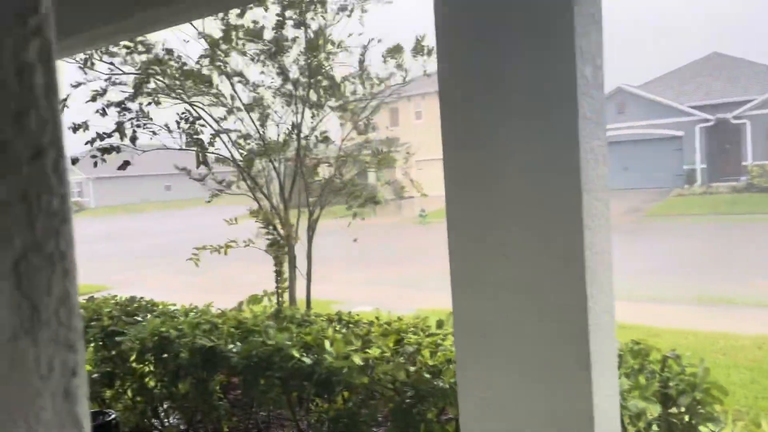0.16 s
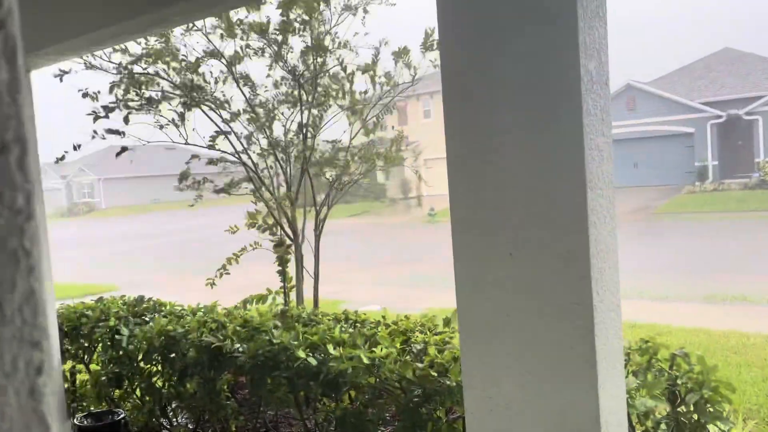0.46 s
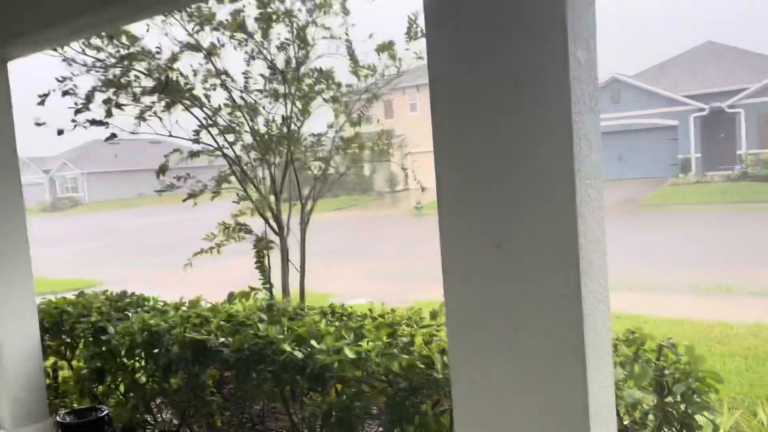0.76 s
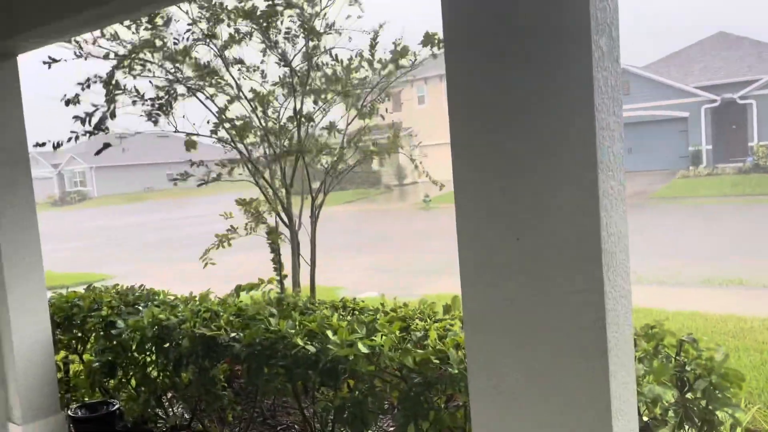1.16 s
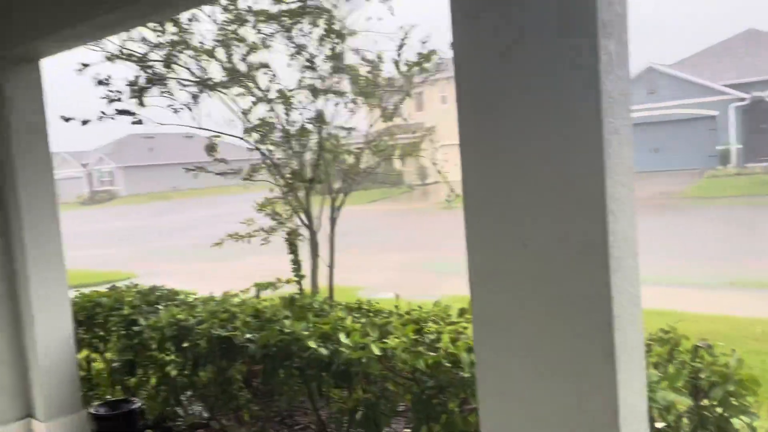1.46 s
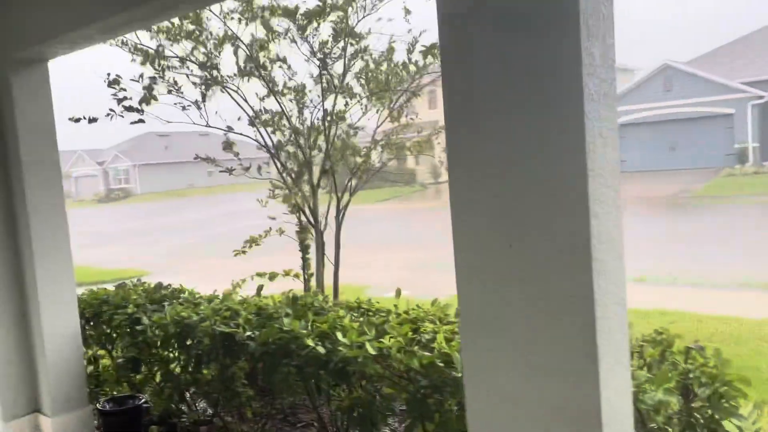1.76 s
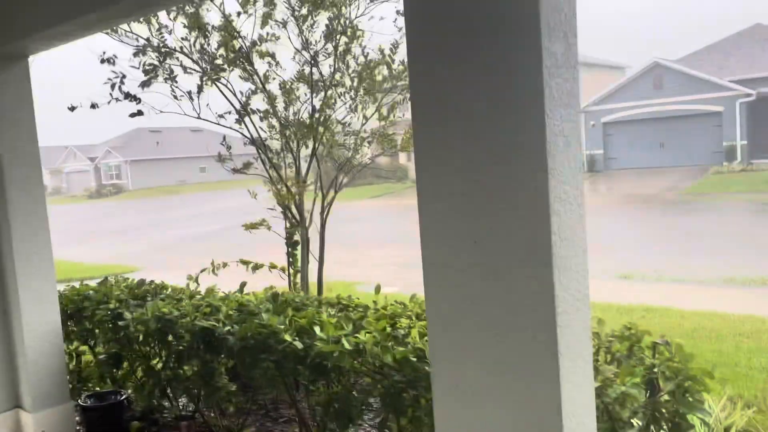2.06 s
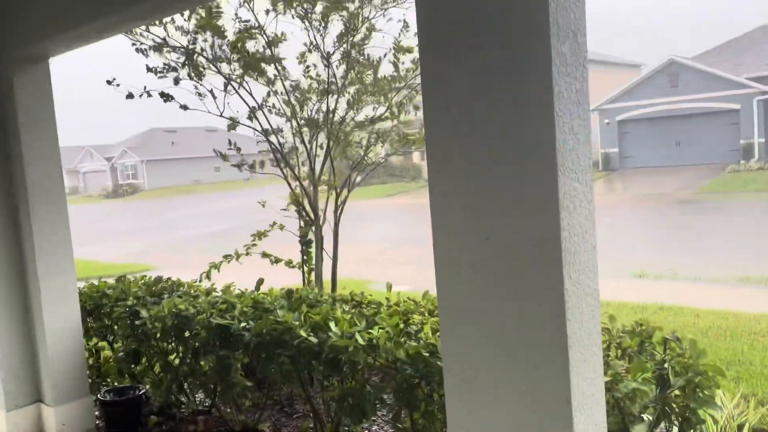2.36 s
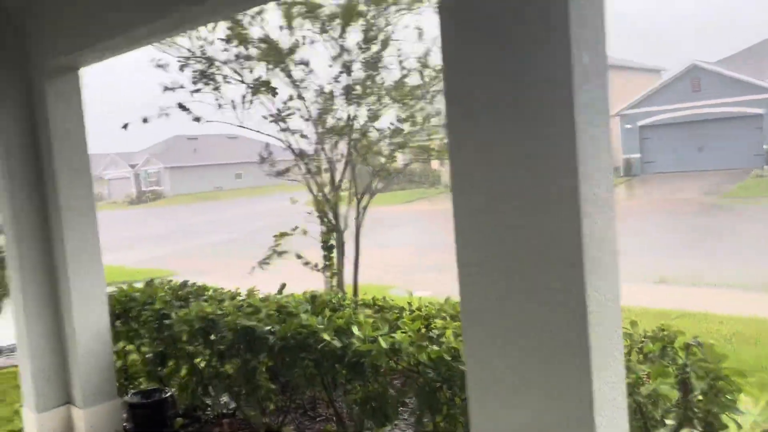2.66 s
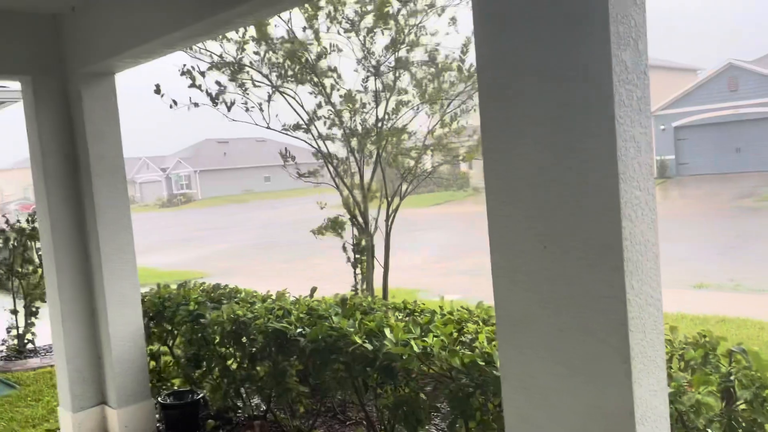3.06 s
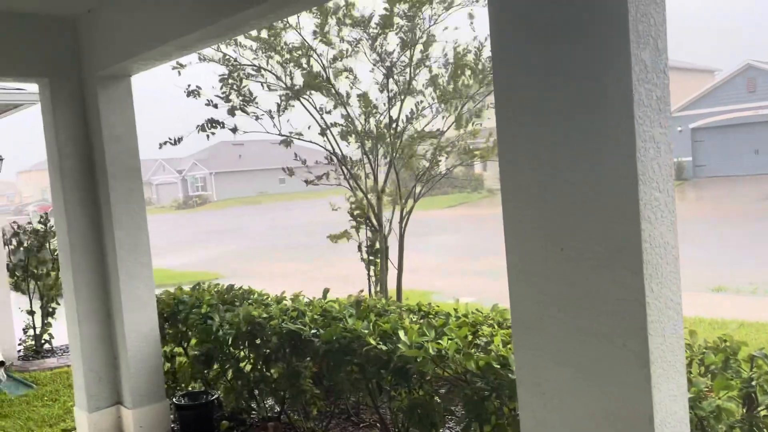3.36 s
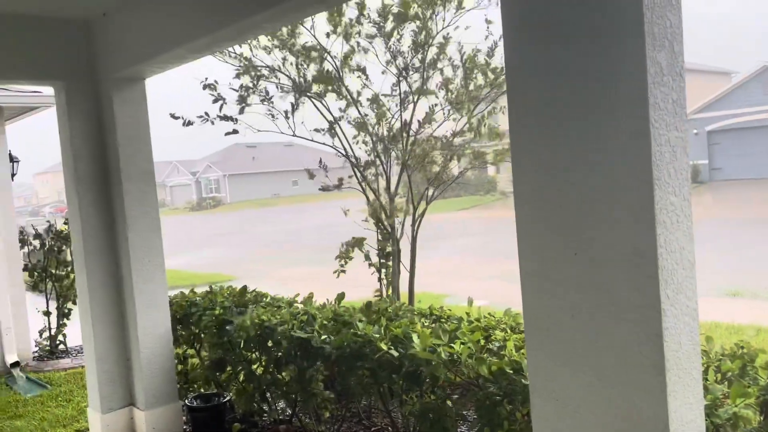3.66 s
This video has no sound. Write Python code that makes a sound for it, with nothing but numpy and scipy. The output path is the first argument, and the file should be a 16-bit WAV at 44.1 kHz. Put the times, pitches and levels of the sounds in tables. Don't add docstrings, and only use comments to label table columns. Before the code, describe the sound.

Rainstorm heard from a porch: dense hiss, wind buffeting, and nearby splats of dripping water.

```python
import sys
import numpy as np
from scipy import signal
from scipy.fft import rfft, irfft, next_fast_len
from scipy.io import wavfile
from scipy.ndimage import uniform_filter1d, map_coordinates

SR = 44100
rng = np.random.default_rng(int(sys.argv[2]) if len(sys.argv) > 2 else 0)


def materialize(psi):
    bounded = np.clip(np.atleast_2d(psi).T, -1, 1)
    quanta = np.round(bounded * 32767).astype(np.int16)
    wavfile.write(sys.argv[1], SR, quanta)


def invert_db(x):
    u = np.asarray(x, float) / 20
    return 10 ** u


N = 167580

# t/s, level/dB
RAIN_LEVEL = [(0, -46), (1.15, -48), (1.93, -47.5), (3.14, -49.5), (3.8, -48)]
# f/Hz, level per Hz/dB
PATTER_SUM = [(150, -8), (500, -15.5), (800, -3), (2200, -4.5), (3300, -6.5), (5200, -8.5), (7000, -10.5),
              (8300, -23.5)]
PATTER_DIFFERENCE = [(150, -39), (500, -8.5), (800, -2.5), (2200, -4.5), (2700, -6.5), (4400, -11),
                     (5500, -9.5), (7500, -20)]
# f/Hz, level per Hz/dB
SPRAY_SUM = [(7500, -12), (8900, -30), (9800, -2.5), (11200, 0.5), (12900, 4), (14000, -2), (15600, -5),
             (17000, -30)]
SPRAY_DIFFERENCE = [(4500, -30), (6500, -1.5), (8600, 6), (10500, 2), (12300, -4.5), (12600, -25),
                    (15000, -37)]
# f/Hz, share/1
QUADRATURE_SHARE = [(1000, 0.22), (5000, 0.4), (6000, -.3), (7500, -0.4), (9500, 0.8)]
PATTER_DB, SPRAY_DB, TICK_DB = 6, -0.5, -20
PATTER_PER_GUST = 0.019

# t/s, level/dB
GUST_LEVEL = [(0, -42), (.1, -58), (.25, -47), (.7, -52.5), (.98, -52.5), (1.12, -45.5), (1.35, -46.5),
              (1.55, -48), (1.85, -43.5), (2.0, -42.5), (2.18, -43.5), (2.4, -45.5), (2.67, -41),
              (2.95, -42), (3.2, -45), (3.45, -41.5), (3.62, -44), (3.8, -42.5)]
# t/s, level/dB
TURBULENCE_LEVEL = [(0, -33.5), (.13, -45), (.26, -41), (.66, -47.5), (.8, -43.5), (.97, -46), (1.3, -48),
                    (1.55, -47.5), (1.75, -41), (1.95, -49.5), (2.12, -45.5), (2.41, -38.5), (2.62, -41.5),
                    (2.87, -35.5), (3.1, -43), (3.35, -46), (3.6, -42), (3.8, -39.5)]
# f/Hz, level per Hz/dB
ROAR_SPECTRUM = [(60, -37), (150, -9), (320, 3.5), (600, -2), (1200, -9), (3500, -30.5)]
# f/Hz, level per Hz/dB
RUMBLE_SPECTRUM = [(20, -43), (45, -3), (75, 2.5), (130, -5.5), (230, -16.5), (700, -40.5)]
ROAR_SIDE_DB, RUMBLE_SIDE_DB, RUMBLE_DB = -7.5, -12, 1.5

# f/Hz, t60/s
PORCH_T60 = [(200, 0.26), (2000, 0.1), (10000, 0.066)]
PORCH_DB = -2.5
# t/s, peak level/dB, centre f/Hz, spread/s
SLUGS = [(1.024, -24, 1090, 0.038), (1.052, -24, 1396, 0.041), (1.076, -33, 1280, 0.035),
         (1.603, -22, 933, 0.044), (1.872, -25, 1390, .04), (2.164, -20.5, 1100, 0.041),
         (2.409, -25, 1050, 0.048), (2.439, -25.5, 1500, 0.044), (2.615, -24, 1190, 0.045),
         (2.836, -23.5, 1410, 0.048), (3.103, -21.5, 1010, 0.052), (3.665, -25, 1500, 0.046)]
# t/s, peak level/dB, centre f/Hz, spread/s
PLOPS = [(.4295, -24, 3000, 0.004), (1.026, -21.5, 2120, .005), (1.032, -25, 1020, .008),
         (1.054, -23.5, 1460, 0.0036), (1.078, -27, 3020, 0.0038), (1.606, -25.5, 970, 0.0064),
         (1.606, -32, 2170, .004), (1.892, -24, 3420, 0.0052), (3.108, -29, 2600, .006),
         (2.166, -19, 1280, 0.0044), (2.167, -24.5, 2700, .004), (2.186, -26, 1060, 0.0069),
         (2.845, -26, 2780, 0.0053), (1.13, -20, 11900, .002), (1.889, -21.5, 2150, .01),
         (2.841, -23, 1880, 0.0059)]
# f/Hz, level per Hz/dB
MIST_SPECTRUM = [(1500, -15), (3000, 5.5), (6500, 1.5), (8000, -13)]
MIST_DB = -13.5
DROP_TURNS, THUD_HZ = 3.15, 313

# t/s, peak level/dB, f/Hz
STRONG_EDDIES = [(0.0166, -6, 296), (0.0393, -17, 200), (0.0561, -15, 226), (0.0796, -25, 150),
                 (0.0931, -28, 116), (0.117, -18.5, 290), (0.1443, -26.5, 108), (0.3032, -23, 92),
                 (0.3303, -13, 155), (0.3714, -28, 87), (0.3917, -23, 179), (0.4068, -17.5, 328),
                 (0.4951, -32, 173)]
# t/s, peak level/dB, f/Hz
FURTHER_SWINGS = [(.071, -26.5, 304), (0.11, -22.5, 100), (.3296, -11.5, 487), (.3314, -15.5, 525),
                  (0.0218, -23, 150), (0.07, -26, 224), (.4125, -25, 226), (.424, -24.5, 490),
                  (0.25, -31, 330), (.325, -24, 254), (0.045, -22.5, 260), (0.036, -21, 190),
                  (0.33, -20.5, 64), (.418, -24.5, 360)]
# t/s, peak level/dB, f/Hz
LATER_EDDIES = [(0.8764, -26, 121), (1.2606, -31, 144), (1.6779, -35, 184), (2.1044, -34, 190),
                (2.1776, -41, 321), (2.1947, -30, 340), (2.2215, -28, 288), (2.2412, -30, 298),
                (2.2794, -40, 184), (2.3009, -25, 129), (2.3674, -25.5, 127), (2.3949, -28, 125),
                (2.4512, -25, 127), (2.4791, -26, 160), (2.5713, -30, 116), (2.7169, -24, 147),
                (2.7507, -23.5, 197), (2.8161, -35, 168), (2.8447, -29, 152), (2.9034, -35, 140),
                (2.9215, -27.5, 121), (2.9449, -28, 112), (3.1407, -30.5, 238), (3.1697, -29.5, 266),
                (3.6781, -47, 155)]
# t/s at onset, peak level/dB, f/Hz
FAINT_EDDIES = [
    (0.716, -36, 81.5),
    (1.158, -31, 87),
    (1.212, -28.5, 82),
    (1.354, -31, 79),
    (1.399, -32, 84.5),
    (1.568, -40, 72.7),
]
# t/s, level/dB, half length/s
BRIGHT_EDGE = (.329, -31, .0025)
# f/Hz, level per Hz/dB
WAKE_SPECTRUM = [(30, 5.5), (80, 1.5), (250, -8.5), (500, -10.5), (900, -42.5)]
PUFF_RISE_S, WAKE_S, WAKE_DB, EDDY_SIDE_DB = 0.0116, 0.016, -13, -12
EDDY_TURNS, EDDY_SAG, EDDY_TAIL = 0.54, 0.77, 1.4

# f/Hz, level/dB
PORT_BALANCE = [(60, 0), (200, 0.6), (380, 1.5), (700, 2.5), (1400, 1.2), (2800, 0), (5600, 3.2),
                (10000, -0.7)]
DIP_HZ, DIP_WIDTH_HZ, DIP_DB = 5620, 105, -7.5
NULL_HZ, NULL_WIDTH_HZ, NULL_DB = 8630, 300, -40
WIDE_TO_HZ = 13050


def unit(x):
    return x / np.sqrt(np.mean(x ** 2) + 1e-20)


def along(points, hz):
    f, v = np.transpose(points)
    return np.interp(np.log(hz + 1), np.log(f + 1), v)


def curve(rows):
    s, v = np.transpose(rows)
    return np.interp(np.arange(N) / SR, s, v)


def wobble(rate):
    return map_coordinates(rng.standard_normal(400), [np.arange(N) * rate / SR])


def filtered(x, response):
    m = next_fast_len(N + SR // 2)
    return irfft(rfft(x, m) * response(np.fft.rfftfreq(m, 1 / SR)), m)[..., :N]


def ports(mid, side):
    return np.array([mid + side, mid - side])


def rush(mid, side, patchy_db, side_db=0, grit=0):
    z = signal.stft(rng.standard_normal((2, N)) + grit, nperseg=512)[2]
    field = uniform_filter1d(rng.standard_normal(z.shape[1:]), size=6, axis=0)
    field = uniform_filter1d(field, size=10, axis=1)
    a, b = signal.istft(z * invert_db(patchy_db * unit(field)), nperseg=512)[1][:, :N]

    def coherent(hz):
        return -1j * along(QUADRATURE_SHARE, hz) * invert_db(along(side, hz))

    def independent(hz):
        return np.sqrt(1 - along(QUADRATURE_SHARE, hz) ** 2) * invert_db(along(side, hz))

    total = filtered(a, lambda hz: invert_db(along(mid, hz)))
    difference = filtered(a, coherent) + filtered(b, independent)
    return ports(total, invert_db(side_db) * difference) / np.std(total)


def ticks(spread_db, count):
    when, rarity, sign = np.moveaxis(rng.random((2, count, 3)), 2, 0)
    size = invert_db(-spread_db * np.log(1 - rarity)) * np.sign(sign - .5)
    return unit(np.array([np.bincount((w * N).astype(int), s, N) for w, s in zip(when, size)]))


def rain():
    gust_db = curve(GUST_LEVEL)
    rain_db = curve(RAIN_LEVEL) + 0.12 * wobble(3.5) + 0.15 * wobble(23.5)
    near_patter = invert_db(TICK_DB) * ticks(spread_db=-1.5, count=4000)
    near_spray = invert_db(TICK_DB + 6) * ticks(spread_db=3, count=6000)
    patter = rush(PATTER_SUM, PATTER_DIFFERENCE, patchy_db=1.5, grit=near_patter)
    spray = rush(SPRAY_SUM, SPRAY_DIFFERENCE, patchy_db=2.0, grit=near_spray)
    patter_db = PATTER_DB + PATTER_PER_GUST * (gust_db - gust_db.mean()) + 0.39 * wobble(8.05)
    spray_db = SPRAY_DB + 0.33 * wobble(9.4)
    return invert_db(rain_db) * (invert_db(patter_db) * patter + invert_db(spray_db) * spray)


def wind():
    roar_db = curve(GUST_LEVEL) + 0.57 * wobble(5.83) + 0.21 * wobble(26)
    roar = rush(ROAR_SPECTRUM, ROAR_SPECTRUM, patchy_db=1.5, side_db=ROAR_SIDE_DB)
    rumble = rush(RUMBLE_SPECTRUM, RUMBLE_SPECTRUM, patchy_db=3.0, side_db=RUMBLE_SIDE_DB)
    lumps = unit(invert_db(1.23 * wobble(20.87)) * rumble)
    return invert_db(roar_db) * roar + invert_db(curve(TURBULENCE_LEVEL) + RUMBLE_DB) * lumps


def porch(x):
    hz, t, z = signal.stft(rng.standard_normal((2, SR // 2)), SR, nperseg=256)
    decay_db = -60 * t / along(PORCH_T60, hz)[:, None]
    tail = signal.istft(z * invert_db(decay_db), SR, nperseg=256)[1]
    return signal.fftconvolve(x, tail / np.linalg.norm(tail[0]), axes=1)[:, :N]


def drops(rows, gain_db, octaves, up_octaves, thud_db, count):
    out, t = np.zeros((2, N + SR)), np.arange(600) / SR
    low = np.arange(count) % 7 == 0
    for (s, db, hz, spread), d in zip(rows, rng.standard_normal((len(rows), count, 6))):
        late = spread * (d[:, 0] ** 2 + d[:, 5] ** 2) / 2
        age = late / spread
        scatter = octaves * d[:, 1] * np.where(low, .3, 1)
        pitch = np.where(low, THUD_HZ, hz * 2 ** up_octaves) * 2 ** scatter
        size = invert_db(db + gain_db + 2.3 * d[:, 2] + low * thud_db - 3.34 * age)
        size = size * (1 - np.exp(-age / 0.067)) * (pitch / hz) ** .25
        cycles = pitch[:, None] * t
        ring = size[:, None] * np.exp(-cycles / DROP_TURNS) * (1 - np.exp(-1.5 * cycles))
        ring = ring * (1 - t / t[-1])
        start = np.round((s + np.minimum(late, .6)) * SR).astype(int)
        i = (start[:, None] + np.arange(len(t))).ravel()
        for k in range(2):
            wave = ring * np.sin(2 * np.pi * cycles + 1.87 * d[:, 3 + k, None])
            out[k] += np.bincount(i, wave.ravel(), N + SR)
    return out[:, :N]


def splats():
    slugs = drops(SLUGS, gain_db=-13.5, octaves=0.759, up_octaves=0.15, thud_db=0.5, count=180)
    return slugs + drops(PLOPS, gain_db=-3.5, octaves=0.15, up_octaves=0, thud_db=-40, count=20)


def mist(water):
    swell = np.sqrt(abs(uniform_filter1d((water ** 2).mean(axis=0), size=500)))
    return invert_db(MIST_DB) * swell * rush(MIST_SPECTRUM, MIST_SPECTRUM, patchy_db=4.5)


def bright_edge():
    s, db, half = BRIGHT_EDGE
    colour = [(250, -34), (700, -2), (1600, 4), (2600, -37)]
    noise = unit(filtered(rng.standard_normal((2, N)), lambda hz: invert_db(along(colour, hz))))
    burst = np.exp(-.5 * ((np.arange(N) / SR - s) / half) ** 2)
    return invert_db(db) * burst * noise * invert_db([[2.5], [-2.5]])


def eddies():
    out, wake = np.zeros((2, N + SR)), np.zeros(N + SR)
    t = np.arange(-2000, 4000) / SR
    lead = 2400
    puffs = [(s + PUFF_RISE_S, db, hz) for s, db, hz in FAINT_EDDIES]
    rows = list(STRONG_EDDIES) + list(FURTHER_SWINGS) + list(LATER_EDDIES) + puffs
    for (s, db, hz), (turn, other) in zip(rows, rng.random((len(rows), 2))):
        u = t * hz / EDDY_TURNS
        shape = np.exp(-.5 * (u / np.where(u > 0, EDDY_TAIL, 1)) ** 2)
        sag = EDDY_SAG / 2
        cycles = EDDY_TURNS * (1 - np.exp(-sag * np.clip(u, -2.5, 40))) / sag
        i = np.arange(len(t)) + round(s * SR) + lead - 2000
        mid_phase = 0.16 * (turn - .5)
        side_phase = 0.11 * (turn - .5) + np.sign(other - .5) / 4
        for k, phase in enumerate((mid_phase, side_phase)):
            out[k, i] += invert_db(db + k * EDDY_SIDE_DB) * shape * np.cos(2 * np.pi * (cycles + phase))
        wake[i] += invert_db(db + WAKE_DB) * np.exp(-abs(t) / np.where(t > 0, WAKE_S, .004))
    ragged = rush(WAKE_SPECTRUM, WAKE_SPECTRUM, patchy_db=6.5, side_db=EDDY_SIDE_DB)
    return ports(*out[:, lead:lead + N]) + ragged * wake[lead:lead + N] + bright_edge()


def scene():
    water = splats()
    water = water + invert_db(PORCH_DB) * porch(water)
    air = rain() + wind() + water + mist(water) + eddies()
    return filtered(air, lambda hz: invert_db(along(PORT_BALANCE, hz) * np.array([[.5], [-.5]])))


def top_cut(x):
    return signal.sosfilt(signal.butter(12, 15690, fs=SR, output="sos"), x)


def record(dry):
    def response(hz):
        bass_cut = (1j * hz / (33 + 1j * hz)) ** 3
        dip = invert_db(DIP_DB * np.exp(-.5 * ((hz - DIP_HZ) / DIP_WIDTH_HZ) ** 2))
        null = invert_db(NULL_DB * np.exp(-((hz - NULL_HZ) / NULL_WIDTH_HZ) ** 4))
        return dip * bass_cut * np.array([null, hz < WIDE_TO_HZ])

    pair = np.array([dry[0] + dry[1], dry[0] - dry[1]]) / 2
    mid, side = filtered(pair, response)
    return top_cut(ports(mid, side))


dry = scene()
out = record(dry)
materialize(out)
```